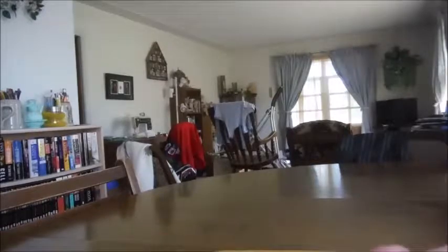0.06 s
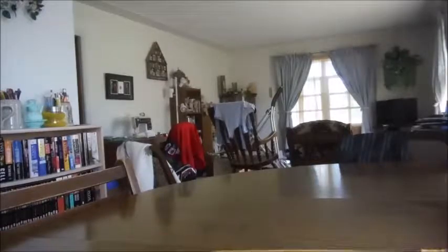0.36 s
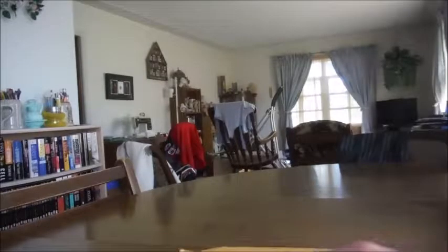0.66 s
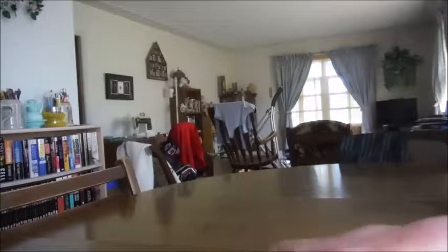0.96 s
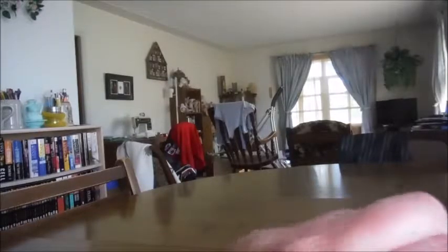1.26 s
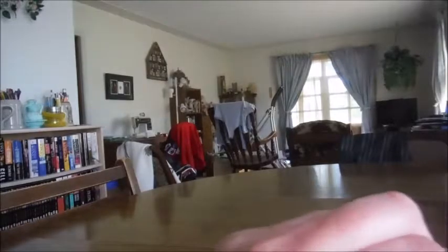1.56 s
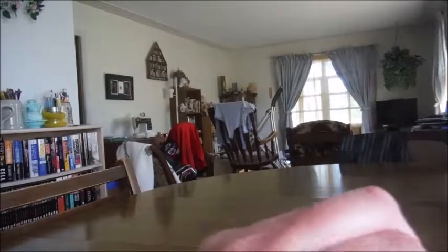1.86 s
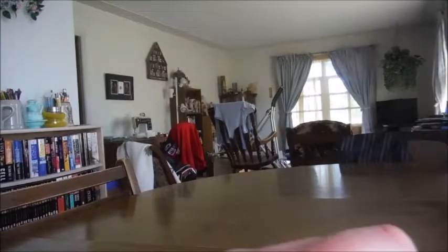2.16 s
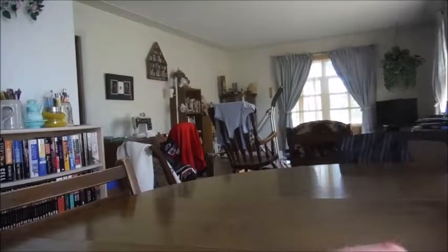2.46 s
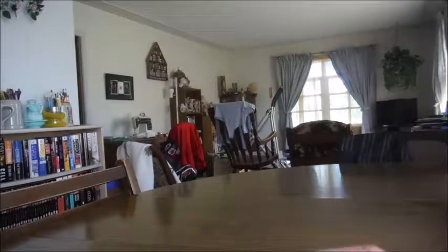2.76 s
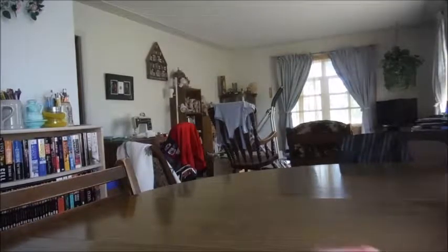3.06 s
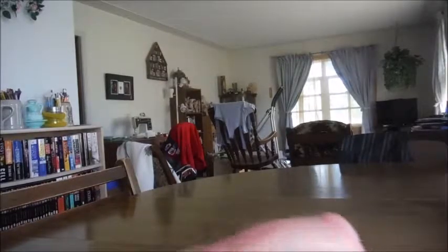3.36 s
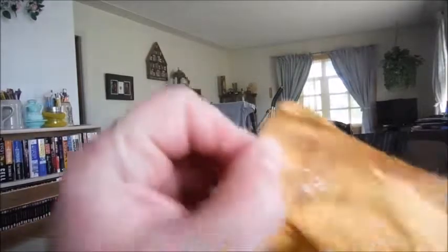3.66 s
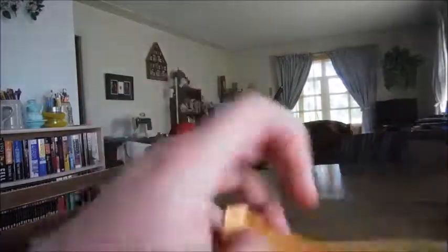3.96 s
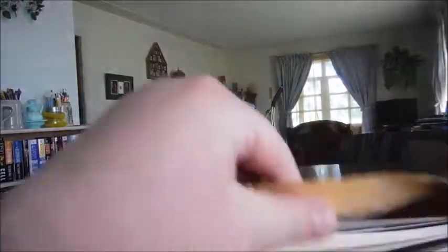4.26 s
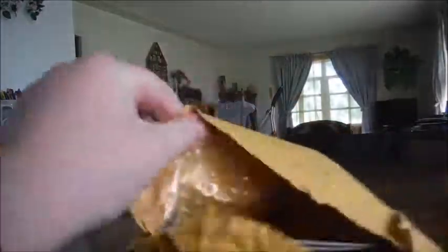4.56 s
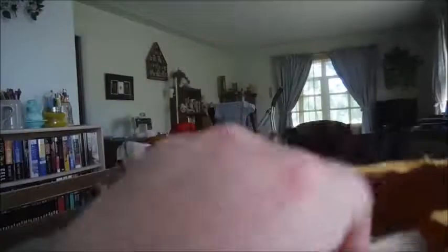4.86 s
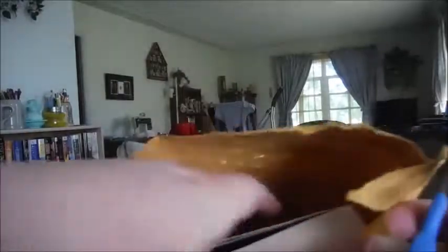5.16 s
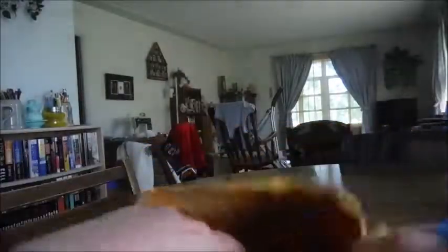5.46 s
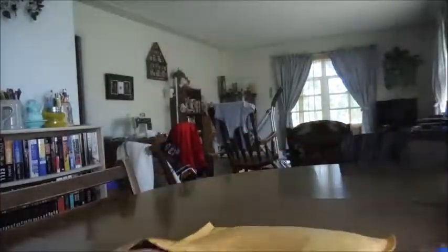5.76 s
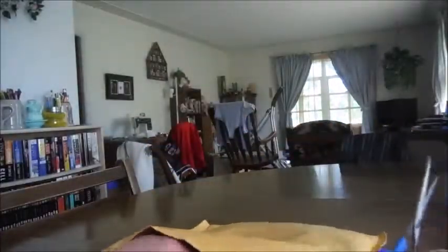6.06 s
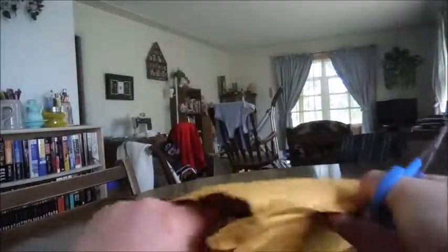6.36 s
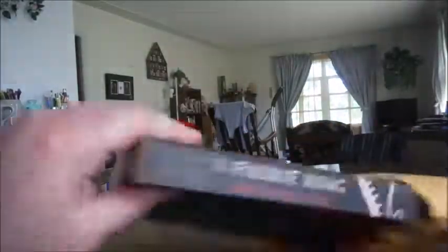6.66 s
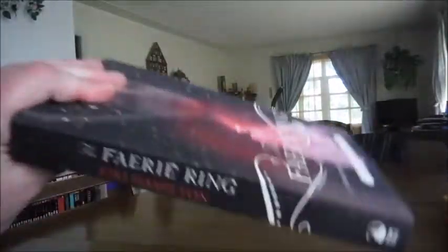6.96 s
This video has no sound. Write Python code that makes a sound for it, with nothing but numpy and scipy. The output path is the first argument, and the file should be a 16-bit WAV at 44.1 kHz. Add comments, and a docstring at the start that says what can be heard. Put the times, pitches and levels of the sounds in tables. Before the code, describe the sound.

A padded paper envelope is handled close by, crinkling and snapping as scissors cut it open and a book slides out.

```python
"""Opening a padded paper mailer

In a quiet living room, close by, a padded envelope is dragged over a wooden table and handled.
Its paper rubs and crinkles, and stiff creases snap all along. Scissors cut its edge in a few strokes,
the mouth is pulled open with a crunch of collapsing folds, and a book slides out.
Book and hands bump the table lightly."""
import sys
import numpy as np
from scipy import signal
from scipy.fft import rfft, irfft, next_fast_len
from scipy.io import wavfile

SR = 44100
rng = np.random.default_rng(int(sys.argv[2]) if len(sys.argv) > 2 else 0)


def file_out(sig):
    """Save sig as 16-bit WAV at sys.argv[1]."""
    # one column per channel
    cols = np.atleast_2d(sig).T
    # limit, then scale
    lim = np.clip(cols, -1, 1)
    pcm = np.round(lim * 32767).astype(np.int16)
    wavfile.write(sys.argv[1], SR, pcm)


N = 309141
TIME = np.arange(N) / SR


def from_db(db):
    """Turn decibels into a number to multiply a sound by."""
    return 10 ** (np.asarray(db) / 20)


def unit_power(x):
    """Scale a sound so that its average power is 1."""
    return x / np.sqrt(np.mean(x ** 2) + 1e-20)


def at_hz(points, hz):
    """Look up a value between the rows of a table, with octaves evenly spaced."""
    known_hz, values = np.transpose(points)
    return np.interp(np.log(np.maximum(hz, 1)), np.log(known_hz), values)


def colour(x, tone):
    """Shape a sound's lows and highs by a tone table, fading steeply past its ends; power 1."""
    size = next_fast_len(N)
    hz = np.maximum(np.fft.rfftfreq(size, 1 / SR), 1)
    edge_fade = np.minimum(hz / tone[0][0], 1) ** 2 * np.minimum(tone[-1][0] / hz, 1) ** 4
    spectrum = rfft(x, size) * from_db(at_hz(tone, hz)) * edge_fade
    return unit_power(irfft(spectrum, size)[:N])


def drift(per_s):
    """A random wobble that heads for a new value `per_s` times a second; power 1."""
    targets = rng.standard_normal(N // 8)
    return unit_power(np.interp(TIME * per_s, np.arange(len(targets)), targets))


def band(x, hz, width):
    """A resonance: keep the frequencies from hz / width to hz * width."""
    width = max(width, 1.05)
    edges = [min(hz / width, .4 * SR), min(hz * width, .45 * SR)]
    return signal.sosfilt(signal.butter(2, edges, "band", fs=SR, output="sos"), x + 1e-18)


def ping(hz, width, size=4096):
    """A resonance struck once rings for a few cycles; peak 1."""
    wave = band(signal.unit_impulse(size), hz, width)
    return wave / np.abs(wave).max()


def add(out, time_s, sound):
    """Mix a sound in at the given time."""
    start = max(round(time_s * SR), 0)
    out[start:start + len(sound)] += sound[:max(N - start, 0)]


def grains(per_s, spread_db, low_hz, high_hz, width, wander_db, patches=20):
    """Tiny buckles each ring a patch of paper; the patches grow louder and softer as it bends."""
    moments = np.flatnonzero(rng.random(N) < per_s / SR)
    sizes = from_db(spread_db * np.minimum(rng.exponential(1, N), 3.5)) * rng.choice([-1, 1], N)
    patch_of, out = rng.integers(0, patches, N), np.zeros(N)
    for patch, hz in enumerate(np.geomspace(low_hz, high_hz, patches)):
        clicks, hits = np.zeros(N), moments[patch_of[moments] == patch]
        bends = rng.standard_normal(N // 2000 + 2)
        bend_db = wander_db * np.interp(hits, np.linspace(0, N, len(bends)), bends)
        clicks[hits] = sizes[hits] * from_db(bend_db)
        out += band(clicks, hz, width)
    return out


def friction(tone, slip, per_s, spread_db, smooth_db):
    """Fibres catch over a smooth rub, both swelling as the paper sticks and slips; power 1."""
    catches = grains(per_s, spread_db, tone[1][0], tone[-2][0], width=1.13, wander_db=3.0)
    smooth_rub = from_db(smooth_db) * rng.standard_normal(N)
    return colour((unit_power(catches) + smooth_rub) * slip, tone)


# The tone of the room's still air: (frequency [Hz], relative level [dB])
AIR_TONE = [(25, -10), (45, -6), (58, 5), (80, -2.5), (150, -4), (300, 2.5), (600, -12), (1500, -3.5),
            (4000, -11.5), (8000, -38), (15000, -24)]
def background(air_db=-61.5, hum_hz=120.4, hum_db=-73.5):
    """Still air and a faint hum from the mains electricity."""
    hum = from_db(hum_db) * np.sqrt(2) * np.sin(2 * np.pi * hum_hz * TIME)
    return hum + from_db(air_db) * colour(rng.standard_normal(N), AIR_TONE)


# How loudly the envelope scrapes over the table: (time [s], level [dB])
DRAG_LEVELS = [(0, -59.5), (.2, -58.5), (.38, -54), (.6, -61), (.76, -51), (.95, -59), (1.12, -75)]
def drag(panel_hz=1700, width=1.18):
    """Dragged flat, the envelope hisses in one broad resonance; then it is lifted off."""
    times, level_db = np.transpose(DRAG_LEVELS)
    scrape = unit_power(band(rng.standard_normal(N), panel_hz, width))
    return from_db(np.interp(TIME, times, level_db)) * scrape


# Single moves that shift or rub the paper:
# (fastest moment [s], rise [s], fall [s], relative sheet level [dB], relative fibre level [dB])
PAPER_MOVES = [(0.22, 0.039, 0.054, -60, -42.5), (0.36, 0.096, 0.18, -53, -42),
               (0.72, 0.036, 0.19, -45.5, -44.5), (0.94, 0.095, .15, -49.5, -45),
               (1.17, 0.033, 0.093, -47, -45), (1.285, 0.026, 0.024, -40, -39.5),
               (1.38, 0.053, 0.059, -51, -44), (1.68, 0.024, 0.045, -38, -36.5),
               (1.785, 0.05, 0.06, -43, -37.5), (2.135, 0.089, 0.039, -40, -39.5),
               (2.42, 0.049, 0.049, -40.5, -36.5), (2.763, 0.068, 0.038, -45, -40.5),
               (3.0, 0.018, 0.052, -44, -43), (3.08, 0.044, 0.12, -39.5, -34),
               (3.331, 0.15, .12, -40.5, -29.5), (3.53, 0.073, .16, -54, -37),
               (3.64, 0.032, 0.015, -37, -33), (3.705, 0.021, 0.051, -41.5, -36),
               (3.985, .17, 0.14, -45, -33), (4.18, 0.14, 0.35, -54, -40), (4.454, 0.18, .17, -33.5, -24.5),
               (4.724, 0.12, 0.16, -44, -30), (4.99, 0.12, 0.16, -45.5, -36),
               (5.15, 0.1, 0.24, -48.5, -37.5), (5.42, 0.22, 0.27, -45.5, -36),
               (5.585, 0.085, 0.034, -35.5, -29), (5.731, 0.081, .025, -48.5, -39.5),
               (5.825, 0.067, 0.068, -44, -38.5), (6.021, 0.16, 0.14, -43.5, -35),
               (6.9, .025, 0.06, -47, -41), (7.01, 0.02, 0.055, -45, -47)]
# The book's long slide out: (time [s], relative sheet level [dB], relative fibre level [dB])
BOOK_SLIDE = [(6.13, -45.5, -42.5), (6.196, -59, -36.5), (6.208, -39, -36), (6.262, -44, -33),
              (6.442, -48.5, -39.5), (6.478, -39, -32), (6.51, -49, -36), (6.562, -39.5, -33.5),
              (6.632, -47, -35), (6.686, -40.5, -28), (6.754, -42.5, -39), (6.83, -63, -50)]
def rubbing_gains(rest_sheet_db=-55, rest_fibre_db=-53, fade_s=0.043):
    """How strongly the sheet flexes and its fibres hiss as moves speed up and slow down."""
    sheet_power = from_db(rest_sheet_db) ** 2  # held paper never lies quite still
    fibre_power = from_db(rest_fibre_db) ** 2
    for fastest, rise_s, fall_s, sheet_db, fibre_db in PAPER_MOVES:
        ramp = np.interp(TIME, [fastest - rise_s, fastest, fastest + fall_s], [0, 1, 0])
        speed = np.sin(np.pi / 2 * ramp) ** 2
        sheet_power += speed * from_db(sheet_db) ** 2
        fibre_power += speed * from_db(fibre_db) ** 2
    times, sheet_db, fibre_db = np.transpose(BOOK_SLIDE)
    sliding = np.interp(TIME, [times[0] - fade_s, times[0], times[-1], times[-1] + fade_s], [0, 1, 1, 0])
    sheet_power += sliding * from_db(np.interp(TIME, times, sheet_db) + 0.5) ** 2
    fibre_power += sliding * from_db(np.interp(TIME, times, fibre_db) + 1) ** 2
    return np.sqrt(sheet_power), np.sqrt(fibre_power)


# The low rustle of the flexing sheet: (frequency [Hz], relative level [dB])
SHEET_TONE = [(90, -13), (150, -10.5), (240, -4), (320, 0.5), (500, -5.5), (800, 2.5), (1200, -0.5),
              (2000, -4.5), (2500, -1.5), (3300, -5.5)]
# The high hiss of rubbed fibres: (frequency [Hz], relative level [dB])
FIBRE_TONE = [(1700, -3), (2500, -3.5), (3500, -3), (5000, -1.5), (6500, 1), (8200, 0), (10000, -9.5),
              (12500, -19), (16000, -27)]
def handling(sheet_gain, fibre_gain, slip_db=1.86, grip_db=1.0):
    """The envelope flexes and rubs on hands, table and book, under a slightly uneven grip."""
    slip = from_db(slip_db * drift(per_s=170) + grip_db * drift(per_s=35))
    sheet = friction(SHEET_TONE, slip, per_s=2200, spread_db=3.5, smooth_db=1.0)
    fibre = friction(FIBRE_TONE, slip, per_s=3500, spread_db=3.0, smooth_db=-1.5)
    return sheet_gain * sheet + fibre_gain * fibre


def crinkles(fibre_gain, gain_db=-26, usual_per_s=130, usual_rub_db=-40, growth=0.17):
    """Barely moving paper gives lone ticks; faster rubbing makes them denser and a little louder."""
    effort_db = 20 * np.log10(fibre_gain) - usual_rub_db
    per_s = usual_per_s * from_db(effort_db / 2)
    ticks = grains(per_s, spread_db=5.0, low_hz=1960, high_hz=7700, width=1.47, wander_db=0, patches=8)
    ticks = signal.sosfilt(signal.butter(4, 12000, fs=SR, output="sos"), ticks)
    return ticks * from_db(gain_db + growth * effort_db)


# The loudest pops of single creases, each flipping a panel (a flat stretch of paper):
# (time [s], panel pitch [Hz], panel level [dB], crease level [dB])
CREASE_SNAPS = [(0.4111, 1920, -37, -20), (0.6037, 1500, -42, -20), (0.651, 1230, -52, -21.5),
                (0.669, 1360, -21.5, -16.5), (0.776, 1210, -15.5, -17.5), (0.9296, 1660, -25.5, -39),
                (1.074, 1980, -35, -22), (1.1587, 1270, -32.5, -18), (1.5219, 2200, -34, -22.5),
                (1.5873, 1230, -29, -23.5), (1.742, 1130, -27, -36), (2.248, 1770, -46, -16.5),
                (2.424, 1690, -20.5, -16), (2.522, 2360, -33, -20), (2.639, 497, -31, -19.5),
                (3.0948, 1090, -21, -19), (3.1068, 1910, -14, -11), (3.1202, 1680, -20, -16),
                (3.2026, 1510, -26, -16), (3.6846, 2820, -22, -14.5), (3.6969, 2580, -8.5, -9),
                (3.7647, 2720, -19, -16), (3.989, 2120, -13.5, -13.5), (4.0003, 2400, -35, -14),
                (4.1174, 1350, -9, -14.5), (4.4627, 3100, -24, -10.5), (4.8497, 2770, -26, -16),
                (4.961, 945, -19.5, -32), (5.0593, 2270, -40, -16), (5.0748, 2170, -13, -5.5),
                (5.1645, 1750, -14.5, -13), (5.4227, 1080, -18.5, -14.5), (5.528, 2610, -26, -19),
                (5.9606, 2420, -2.5, -8), (6.0158, 1370, -14, -16), (6.081, 1410, -10.5, -16)]
def snaps(usual_hz=6540, usual_db=-19, octaves_per_db=0.0573, rebound_db=-9, rebound_s=0.000796,
          shiver_db=-12, shiver_s=0.016, size=4096):
    """A crease pops, its panel flips and springs back, and the sheet around it shivers briefly."""
    out, fade = np.zeros(N), from_db(-60 * TIME[:size] / shiver_s)
    for time_s, panel_hz, panel_db, crease_db in CREASE_SNAPS:
        # A longer crease pops louder and lower.
        crease_hz = usual_hz * 2 ** (-octaves_per_db * (crease_db - usual_db))
        panel = from_db(panel_db) * ping(panel_hz, width=1.53)
        pop = panel + from_db(crease_db) * ping(crease_hz, width=1.29)
        shiver = rng.standard_normal(size) * fade
        add(out, time_s, pop)
        add(out, time_s + rebound_s * (.5 + rng.random()), -from_db(rebound_db) * pop)
        add(out, time_s, from_db(shiver_db) * signal.fftconvolve(pop, shiver / np.linalg.norm(shiver)))
    return signal.sosfilt(signal.butter(2, 12000, fs=SR, output="sos"), out)


# The hollow ring of parcel and table: (pitch [Hz], relative level [dB], time to fade by 60 dB [s])
HOLLOW_RING = [(314, -9.5, 0.19), (359, -14, 0.081)]
# Bumps of hands, parcel and book: (time [s], thud level [dB], thud pitch [Hz], ring gain [dB])
SOFT_BUMPS = [(.778, -58, 250, -35), (0.938, -67, 250, -37), (1.253, -52, 300, -31),
              (1.281, -44, 350, -30.5), (1.626, -63, 181, -32.5), (1.744, -44, 171, -38),
              (2.926, -57, 200, -34), (3.168, -39, 263, -37), (3.323, -35, 253, -25),
              (3.647, -36.5, 216, -44), (4.118, -38, 257, -44), (4.319, -31, 310, -27),
              (4.331, -32.5, 161, -46), (4.418, -49, 202, -31), (4.456, -45, 130, -44),
              (4.523, -37, 120, -33), (5.022, -45, 128, -47), (5.166, -39.5, 245, -35),
              (5.584, -27, 170, -31), (5.641, -44, 149, -45), (6.749, -34, 300, -40)]
def bumps(size=8192):
    """Each padded knock gives a dull thud and a short hollow ring."""
    out, t = np.zeros(N), TIME[:size]
    ring = sum(from_db(db - 60 * t / fade_s) * np.sin(2 * np.pi * hz * t)
               for hz, db, fade_s in HOLLOW_RING)
    for time_s, thud_db, thud_hz, ring_db in SOFT_BUMPS:
        thud = ping(thud_hz, width=1.44, size=size)
        add(out, time_s, from_db(thud_db) * thud + from_db(ring_db) * ring)
    return out


# The tone of crushed fibres: (frequency [Hz], relative level [dB])
CRUNCH_TONE = [(1700, -1.5), (2500, 1), (4000, -0.5), (6500, 4), (8200, -1), (10000, -6.5), (12500, -15.5),
               (16000, -33)]
# Folds collapsing: (time [s], length [s], panel pitch [Hz], panel level [dB], fibre level [dB])
FOLD_CRUNCHES = [(1.23, 0.0064, 1410, -40, -31), (1.6, 0.0025, 1500, -36, -32),
                 (2.9205, 0.0026, 1180, -25.5, -21.5), (2.951, 0.0055, 970, -30, -19),
                 (3.1645, 0.0033, 684, -22.5, -21.5), (3.322, 0.0077, 1540, -29, -19),
                 (3.634, 0.0021, 2150, -24, -28), (4.331, 0.0031, 570, -26, -25),
                 (4.365, 0.0049, 1780, -19, -18), (4.376, 0.011, 2220, -26, -22),
                 (4.415, 0.0052, 2110, -21, -24), (4.4295, 0.0013, 2050, -27, -30),
                 (4.4345, 0.0018, 2300, -24, -17), (4.452, 0.0067, 590, -34, -25),
                 (4.525, 0.0048, 1380, -27, -36), (4.742, 0.0056, 935, -33.5, -29),
                 (5.575, 0.018, 1680, -35, -26), (5.787, 0.004, 2420, -43, -30.5)]
def crunches(rise_s=0.00078, fall_s=0.0011, jerk_db=5.5, size=2048):
    """A fold gives way in a few milliseconds of packed, jerky buckles that shake its panel."""
    out, t = np.zeros(N), TIME[:size]
    buckles = colour(rng.standard_normal(N) * from_db(jerk_db * drift(per_s=900)), CRUNCH_TONE)
    for k, (time_s, length_s, panel_hz, panel_db, fibre_db) in enumerate(FOLD_CRUNCHES):
        burst = np.interp(t, np.cumsum([0, rise_s, length_s, fall_s]), [0, 1, 1, 0])
        panel = unit_power(band(rng.standard_normal(2 * size), panel_hz, width=1.48)[size:])
        fibre = buckles[k * size:(k + 1) * size]
        add(out, time_s - rise_s, burst * (from_db(panel_db) * panel + from_db(fibre_db) * fibre))
    return out


# The tone of the sheet between the blades: (frequency [Hz], relative level [dB])
CUT_SHEET_TONE = [(90, -32), (170, -12.5), (260, -5), (335, 3.5), (500, -6.5), (790, 3.5), (1030, 1),
                  (1650, -3), (2100, -4.5), (2500, -8.5), (3300, -7)]
# The tone of fibres being cut: (frequency [Hz], relative level [dB])
CUT_FIBRE_TONE = [(1700, 1), (2500, 4), (3500, -1), (4300, -1.5), (6500, 1), (8200, -1.5), (10000, -9),
                  (12500, -17.5), (16000, -31)]
# Strokes of the scissors:
# (start [s], hardest bite [s], end [s], panel pitch [Hz], sheet level [dB], fibre level [dB])
SCISSOR_STROKES = [(1.599, 1.634, 1.672, 1200, -31, -27.5), (1.933, 1.981, 2.015, 844, -35, -36.5),
                   (2.275, 2.31, 2.38, 1720, -28.5, -27.5), (2.55, 2.59, 2.714, 785, -38.5, -39),
                   (2.912, 2.926, 3.005, 990, -30.5, -25.5), (2.965, 2.974, 3.005, 1060, -33.5, -29),
                   (3.086, 3.119, 3.09, 864, -32, -23), (3.282, 3.325, 3.326, 1440, -25, -22.5)]
def scissors(ends_db=-9, slip_db=2.0, release_s=0.0011, ring_db=-7):
    """The blades bite harder, cut fibres in jerks, then ease off; the loose panel rings along."""
    slip, out = from_db(slip_db * drift(per_s=260)), np.zeros(N)
    sheet = friction(CUT_SHEET_TONE, slip, per_s=3000, spread_db=2.0, smooth_db=0.5)
    fibre = friction(CUT_FIBRE_TONE, slip, per_s=4000, spread_db=2.5, smooth_db=-0.5)
    for start, bite, end, panel_hz, sheet_db, fibre_db in SCISSOR_STROKES:
        closing = np.interp(TIME, [start - release_s / 2, start, end, end + release_s], [0, 1, 1, 0])
        force = closing * from_db(np.interp(TIME, [start, bite, end], [ends_db, 0, ends_db]))
        ring = from_db(ring_db) * unit_power(band(sheet, panel_hz, width=1.106))
        out += force * (from_db(sheet_db) * unit_power(sheet + ring) + from_db(fibre_db) * fibre)
    return out


# How long the room's echo lasts: (frequency [Hz], time to fade by 60 dB [s])
ECHO_FADES = [(200, 0.45), (1000, 0.15), (4000, 0.2), (12000, 0.026)]
def room_echo(x, delay_s=0.0051):
    """Sound scatters around a furnished room, the highest treble dying first."""
    t, tail = TIME[:SR // 2], 0
    for hz in 180 * 2. ** np.arange(7):
        octave = band(rng.standard_normal(len(t)), hz, width=np.sqrt(2))
        tail = tail + octave * from_db(-60 * t / at_hz(ECHO_FADES, hz))
    tail = tail * (t > delay_s)
    return signal.fftconvolve(x, tail / np.linalg.norm(tail))[:N]


def scene(handling_db=-1.0, echo_db=-19):
    """Everything happens within arm's reach, so the echo stays faint."""
    sheet_gain, fibre_gain = rubbing_gains()
    rustle = from_db(handling_db) * handling(sheet_gain, fibre_gain)
    near = rustle + drag() + crinkles(fibre_gain) + scissors() + crunches() + snaps() + bumps()
    return (near + from_db(echo_db) * room_echo(near) + background())[None]


def record(dry):
    """Cut off the very highest treble steeply, above 15900 Hz."""
    return signal.sosfilt(signal.ellip(10, .1, 80, 15900, fs=SR, output="sos"), dry)


dry = scene()
out = record(dry)
file_out(out)
```